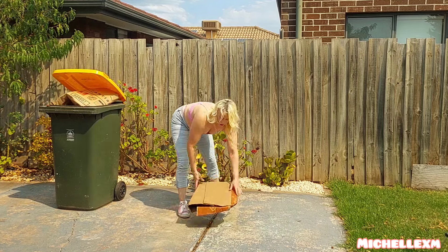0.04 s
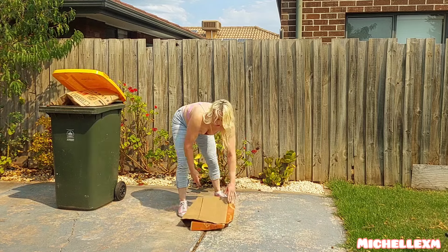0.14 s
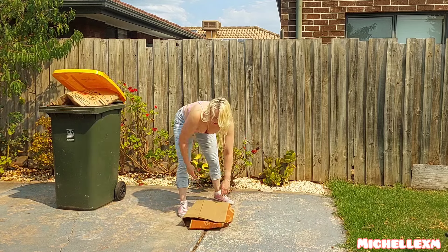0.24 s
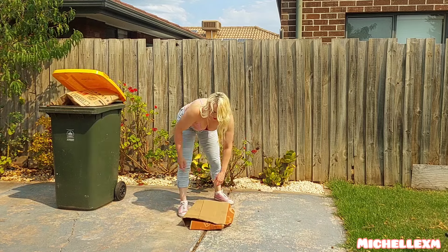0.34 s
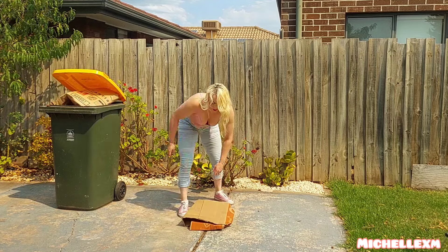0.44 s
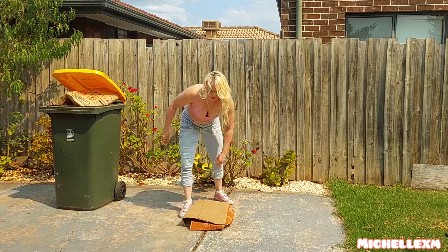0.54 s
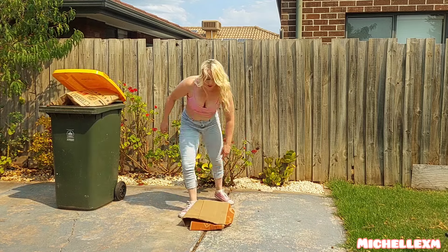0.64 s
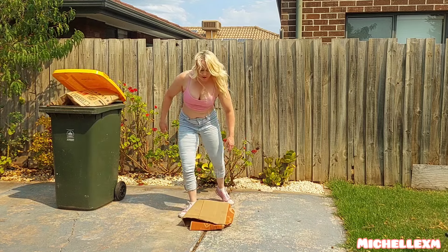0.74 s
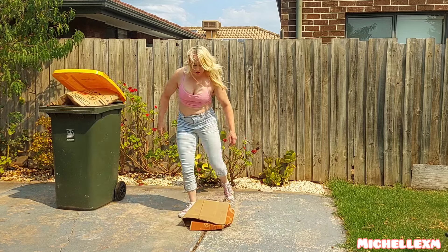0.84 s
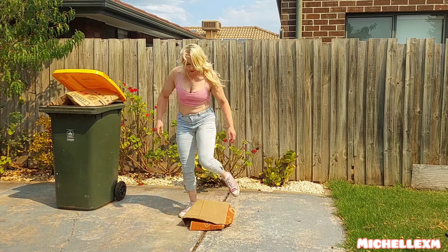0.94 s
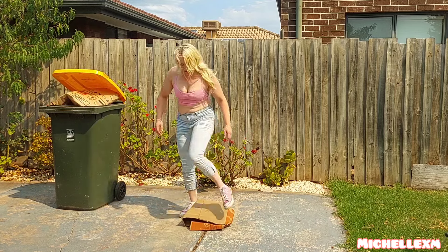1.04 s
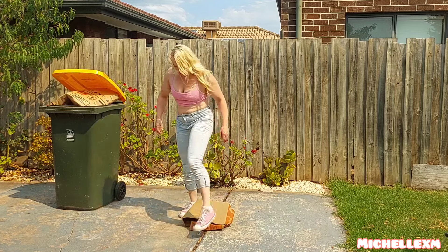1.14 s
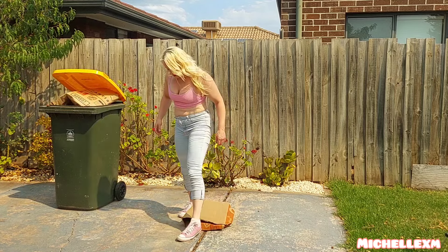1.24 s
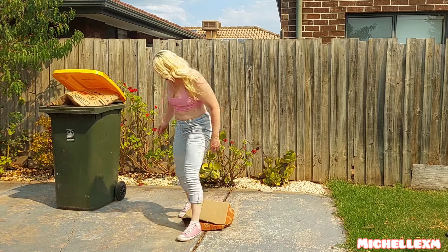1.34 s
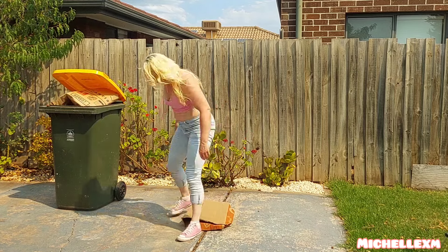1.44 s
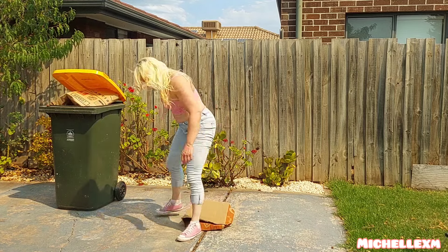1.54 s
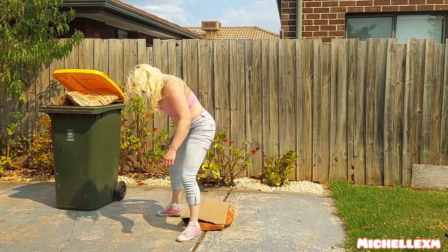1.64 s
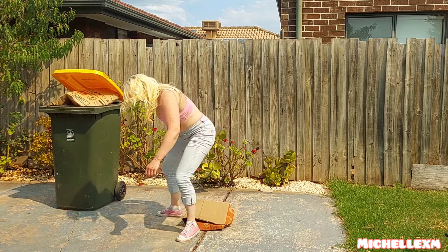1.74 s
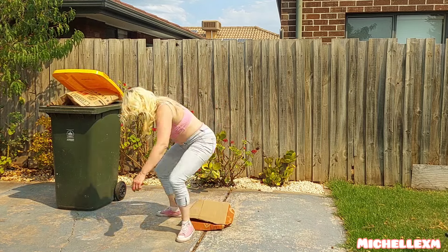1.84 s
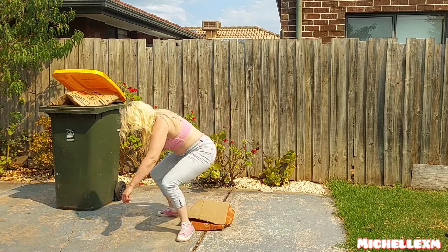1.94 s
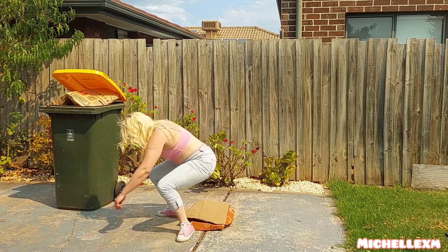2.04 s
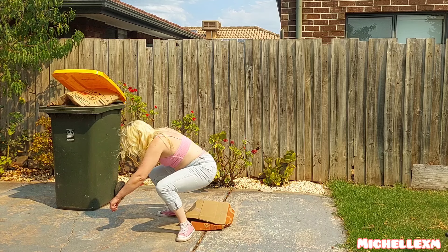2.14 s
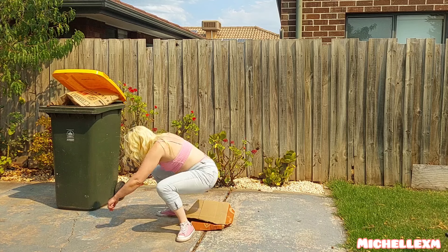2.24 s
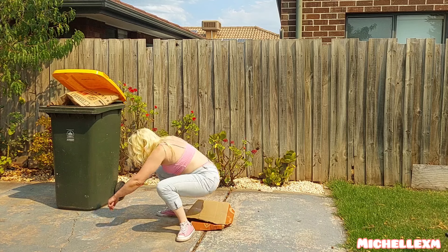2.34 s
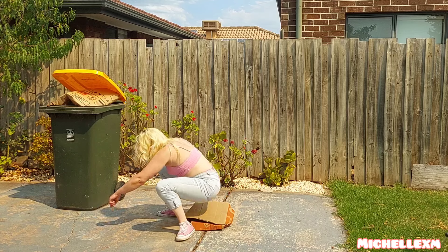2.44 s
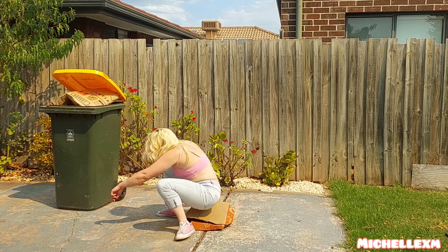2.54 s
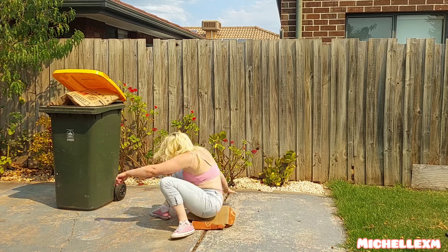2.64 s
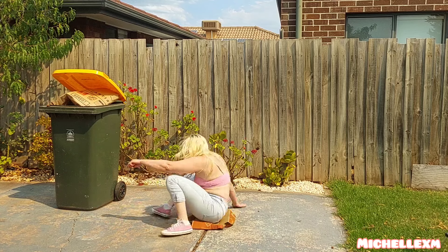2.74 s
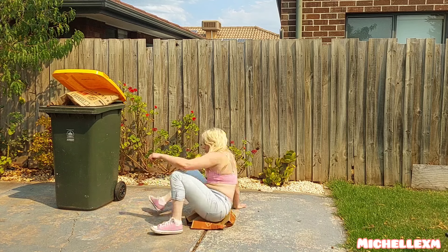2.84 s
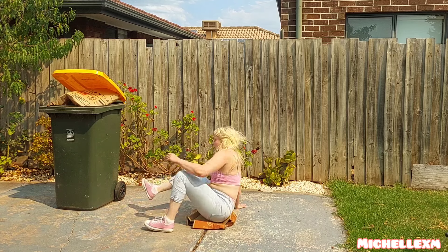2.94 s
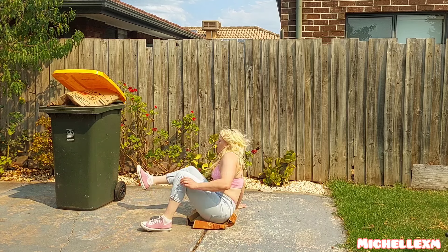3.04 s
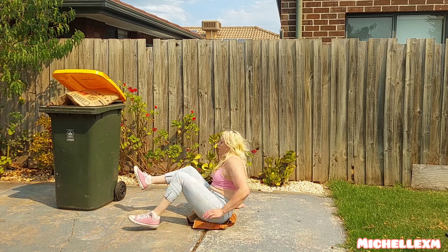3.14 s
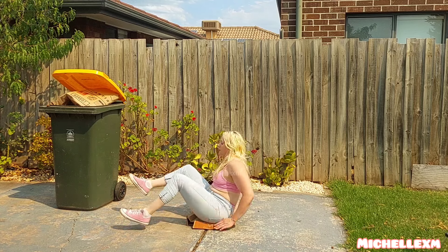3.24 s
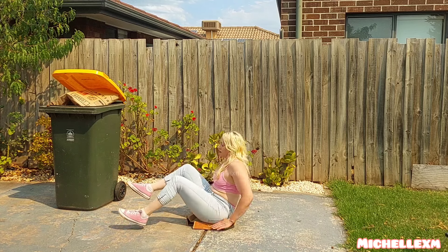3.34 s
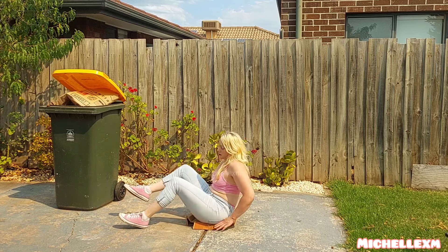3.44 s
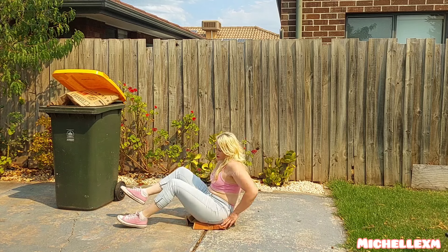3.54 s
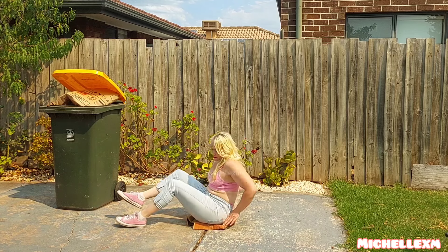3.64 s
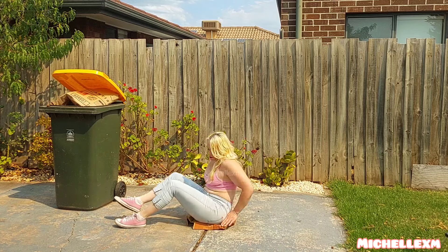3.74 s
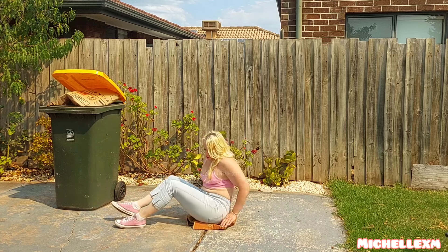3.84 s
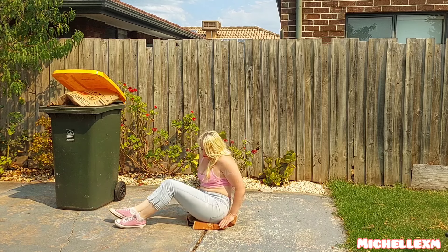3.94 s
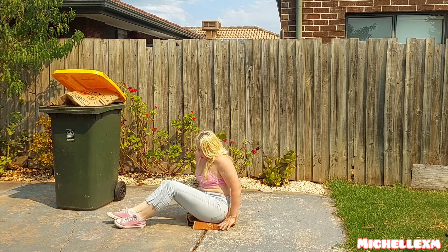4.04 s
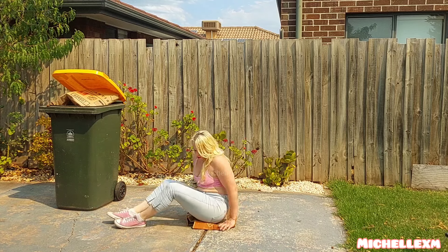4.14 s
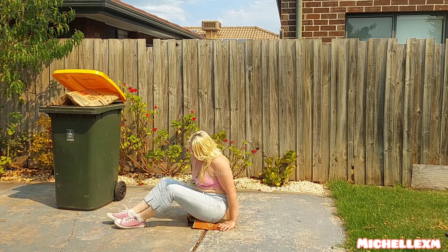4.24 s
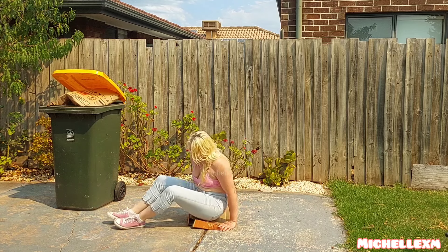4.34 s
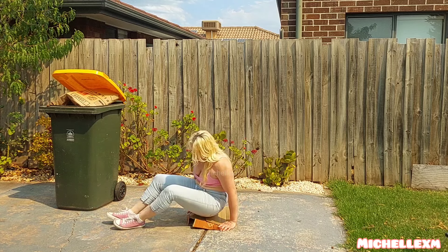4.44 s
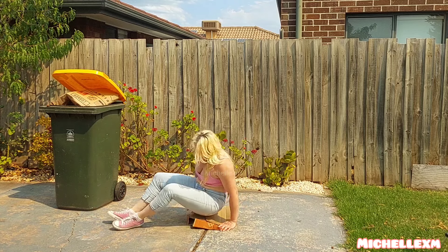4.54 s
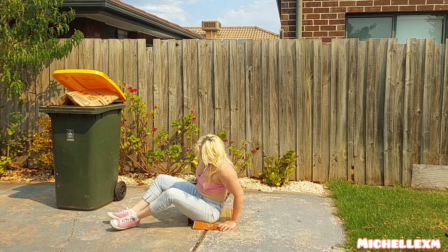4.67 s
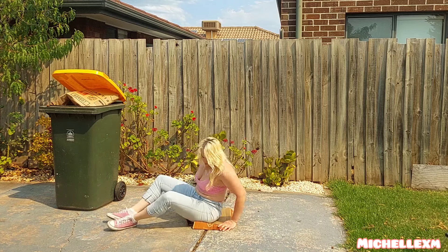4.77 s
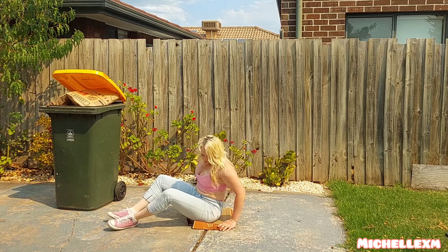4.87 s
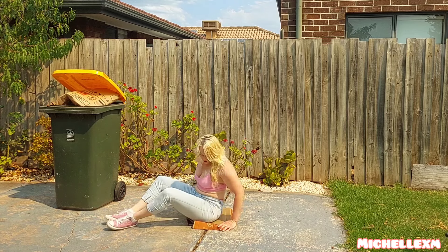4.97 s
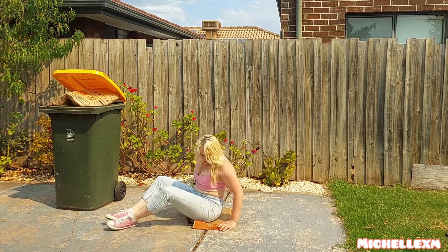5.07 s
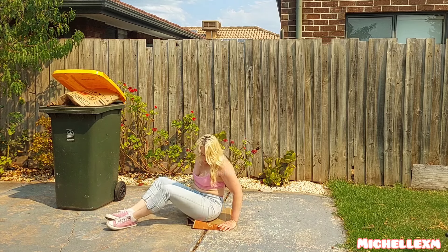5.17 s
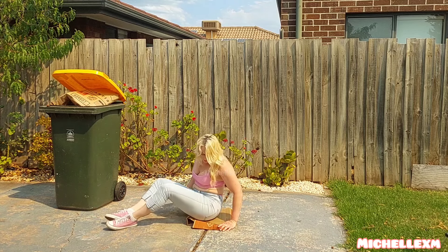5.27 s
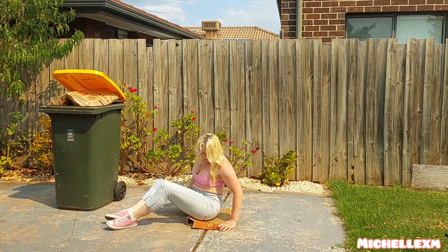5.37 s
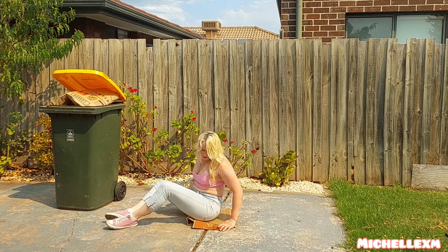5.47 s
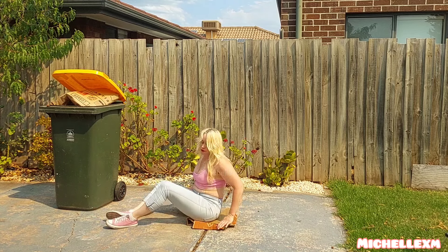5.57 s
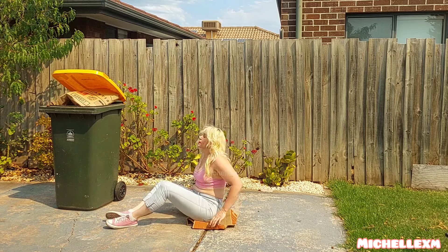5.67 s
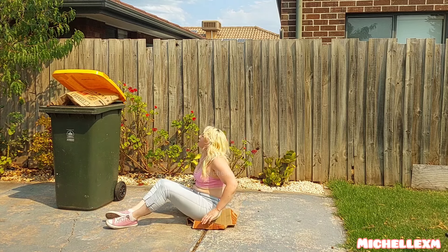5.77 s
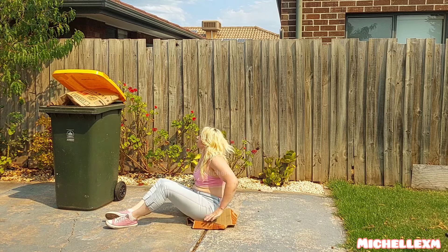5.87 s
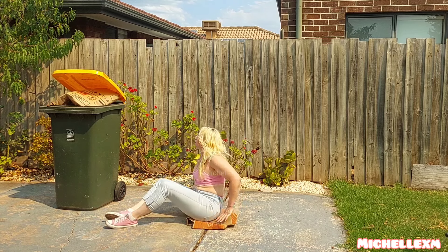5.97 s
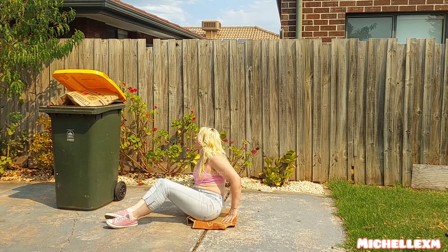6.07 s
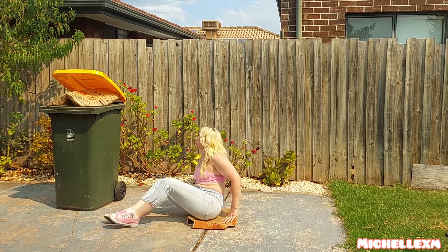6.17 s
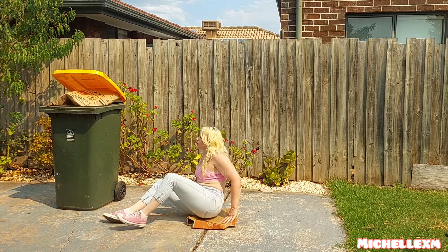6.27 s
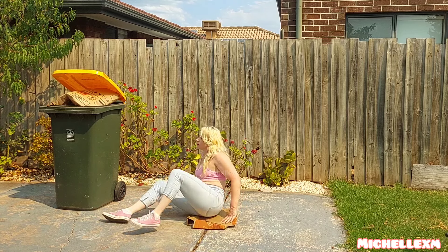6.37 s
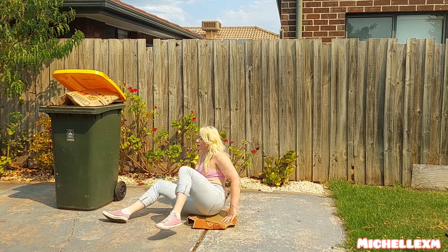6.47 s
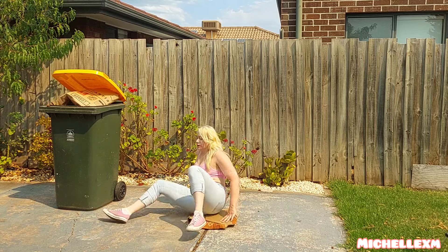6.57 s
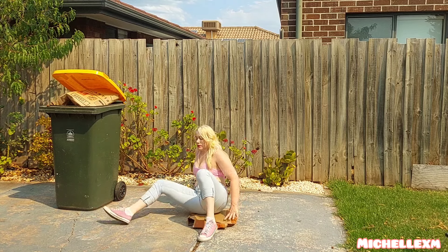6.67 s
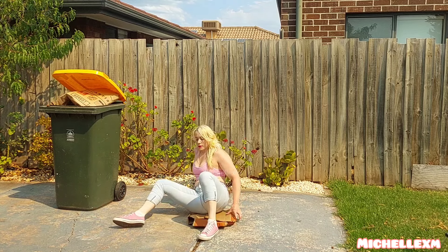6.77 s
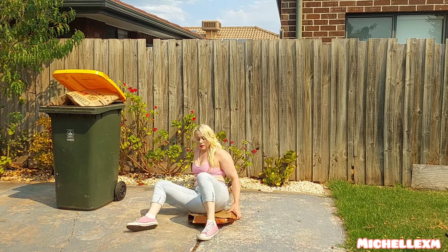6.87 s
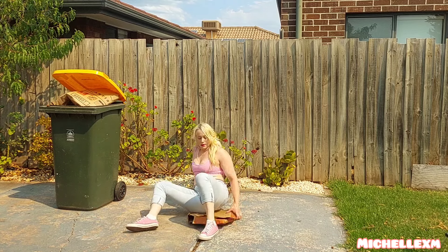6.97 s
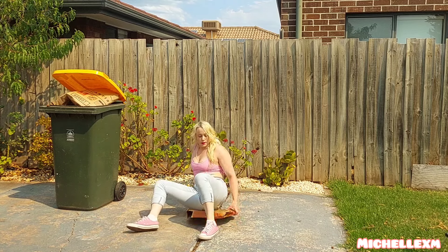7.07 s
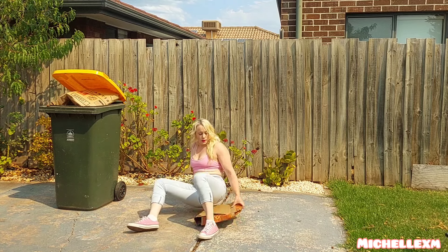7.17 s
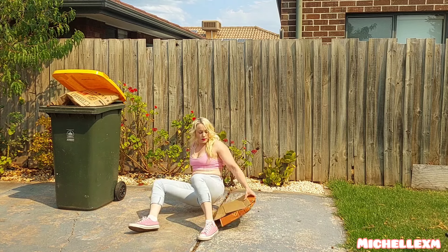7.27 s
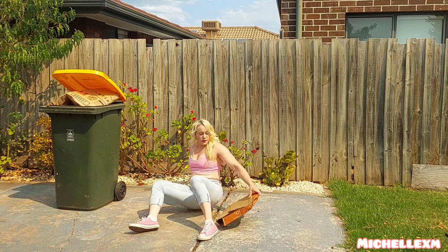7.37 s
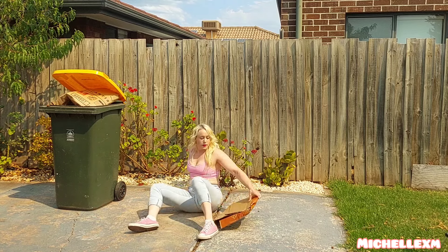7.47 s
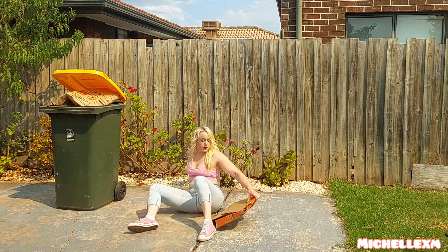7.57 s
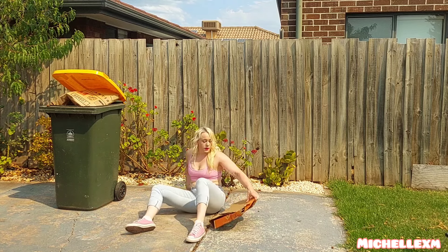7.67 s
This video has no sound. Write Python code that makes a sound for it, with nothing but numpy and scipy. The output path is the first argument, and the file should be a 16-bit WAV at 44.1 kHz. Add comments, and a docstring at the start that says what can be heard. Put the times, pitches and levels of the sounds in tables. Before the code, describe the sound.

Outdoors, cardboard lands with a hollow slap, then buckles and crackles under shifting weight, with distant traffic rumbling steadily.

```python
"""A cardboard box drops on a concrete patio, then is sat on, shifted and pulled out.
Its panels buckle, pop and ring, its flutes crackle, and it sticks and slips on the grit.
Jeans and shoes swish in the first strides. A fence throws the sounds back,
over the low rumble of far traffic and one faint insect."""
import sys
import numpy as np
from scipy import signal
from scipy.fft import rfft, irfft
from scipy.io import wavfile

SR = 44100
rng = np.random.default_rng(int(sys.argv[2]) if len(sys.argv) > 2 else 0)


def master(y):
    """Save y as 16-bit WAV."""
    cut = np.clip(np.atleast_2d(y).T, -1, 1)
    pcm = np.round(cut * 32767)  # scale
    wavfile.write(sys.argv[1], SR, pcm.astype(np.int16))


N = 340011
TIME = np.arange(N) / SR
FREQS = np.fft.rfftfreq(N, 1 / SR)

# box panel modes: (frequency [Hz], level [dB], t60 [s])
PANEL_MODES = [(90.8, -5, 0.19), (222.6, -5, 0.21), (252, 0, 0.07), (329.7, -4.5, 0.098), (400, -2, 0.081),
               (483, -5.5, 0.031), (560, -3.5, 0.1), (675, -6.5, 0.15), (779.4, -4, 0.091),
               (870, -3, 0.045), (1050, -4.5, 0.035), (1192, -5, 0.048), (1573, -5.5, 0.062),
               (1948, -0.5, 0.059), (2510, -6, 0.047)]
# left-right correlation, box and open air: (frequency [Hz], correlation [-1..1])
BOX_CORRELATION = [(100, 0.58), (300, 1), (700, 0.51), (1400, 0.75), (3100, 0.3), (6800, 0.067),
                   (15000, 0.047)]
AIR_CORRELATION = [(60, 0.97), (130, 0.88), (290, 0.82), (640, -0.045), (1410, -0.51), (3100, -0.21),
                   (7000, -0.16)]


def blows(ring_db=-9, rattle_db=-14, rattle_s=.01, damping=0.46, build_cycles=13, crackle_trim_db=-10):
    """A panel snaps through: a push of air, a short ring, flaps rattling, flutes cracking after it."""
    # (time [s], level [dB], sharpness [Hz], relative ring [dB], relative crackle [dB])
    hits = [ (0.162, -22, 1300, 1.5, 2.5), (0.189, -21.5, 860, 4.5, -15), (0.2040, -12, 1550, 0.5, -8),
            (0.2090, -11.5, 380, -3.5, -19), (0.217, -7.5, 706, -3, -17), (0.2260, -5, 960, -7, -20),
            (0.3733, -33, 880, 2, -26), (1.2687, -37.5, 980, 5.5, -20), (1.312, -36, 580, 4, -19),
            (1.658, -33, 1190, 1, -17), (2.6150, -26, 480, 7, -25), (2.6240, -16, 400, 3, -4),
            (2.6316, -16, 340, 8.5, -5), (2.6380, -19, 390, 2, -20), (2.6433, -14.5, 1740, 0.5, -18),
            (2.6530, -12.5, 900, -9, -20), (2.696, -15, 340, -9, -2), (2.717, -16.5, 616, -8, -14),
            (2.7340, -16, 314, 1.5, -19), (2.7350, -19, 1680, -4, -22), (2.9359, -33, 1290, -2, -8),
            (3.02, -39, 600, 8.5, -18), (3.2688, -41.5, 1790, -1, -19), (3.4066, -35.5, 1600, -19, -3),
            (4.1947, -28.5, 2700, -17, -18), (4.3478, -19, 540, -1, -16), (4.3499, -22.5, 1650, -2, -6),
            (4.357, -20, 1270, -16, -14), (4.702, -26.5, 700, -1.5, 2), (4.719, -24.5, 263, 7.5, -18),
            (4.7321, -13.5, 1760, -6, -2.5), (4.742, -23.5, 1500, -2, -2), (4.7459, -18.5, 1300, -15, 2),
            (4.8854, -38, 1330, -10, -14), (5.2633, -35, 1910, -4, -25), (5.5899, -37, 1790, 3.5, -12),
            (6.7060, -20.5, 560, -6, -18), (6.7069, -28, 1730, -12, -15), (7.0484, -32.5, 1910, -23, -10),
            (7.2400, -22.5, 900, -2, -13), (7.2640, -20, 1050, -8, -16), (7.2964, -26, 900, -12, 1)]
    crackle_spectrum = [(100, -14), (400, -14), (900, -7), (1500, 1), (2100, -4.5), (3000, -10.5),
                        (5000, -13.5), (7500, -18), (9000, -18), (11500, -10), (16000, -22)]  # (frequency [Hz], level [dB])
    t = np.arange(SR // 4) / SR
    hz, mode_db, t60_s = np.transpose(PANEL_MODES)[:, :, None]
    direct, rattle, crackle_power = np.zeros((3, 2, N))
    for s, db, sharp_hz, panel_db, crackle_db in hits:
        phase = 2 * np.pi * sharp_hz * t
        contact = 1 - np.exp(-phase)
        push = 2 * contact * np.exp(-damping * phase) * np.sin(phase)
        # each blow lands elsewhere on a box of a new shape
        polarity = rng.choice([-1., 1.], hz.shape)
        detune = 1 + 0.022 * rng.standard_normal(hz.shape)
        modes = polarity * gain_of(mode_db - 60 * t / t60_s) * np.sin(2 * np.pi * hz * detune * t)
        modes /= 1 + (hz / sharp_hz) ** 2  # a soft blow leaves the high modes still
        add(direct, s, gain_of(db) * (push + gain_of(ring_db + panel_db) * contact * modes.sum(0)))
        flaps = rng.standard_normal((2, len(t))) * np.exp(-t / rattle_s)
        flaps = signal.fftconvolve(flaps, push[None] / np.linalg.norm(push), axes=1)
        add(rattle, s, gain_of(db + rattle_db) * flaps)
        # flutes give way more gradually under a slow blow, and crack for longer after a hard one
        yielding = 1 - np.exp(-t * sharp_hz / build_cycles)
        fade_s = .042 * 2 ** ((db + 17.5) / 30)
        add(crackle_power, s, (yielding * gain_of(db + crackle_db - 20 * t / fade_s)) ** 2)
    snaps = grains(per_s=4000, spread_db=-0.5, clump_db=1.5) * np.sqrt(crackle_power)
    crackle = gain_of(crackle_trim_db) * panel_ring(colour(snaps, crackle_spectrum), ring_db=-7)
    radiated = low_cut(direct, hz=95, order=2)  # the direct blow is thin below about 95 Hz
    return radiated + paired(rattle + crackle, BOX_CORRELATION)


def panel_ring(x, ring_db):
    """Whatever scratches the board also sets its panels ringing."""
    t = np.arange(SR // 10) / SR
    hz, db, t60_s = np.transpose(PANEL_MODES)[:, :, None]
    decay = gain_of(-60 * t / t60_s)
    modes = 2 * decay / decay.sum(1, keepdims=True) * np.cos(2 * np.pi * hz * t)
    ring = (gain_of(db + ring_db) * modes).sum(0)
    return x + signal.oaconvolve(x, ring[None], axes=1)[:, :N]


def load(seated_s=2.7, seated_db=(-67.5, -56, -81)):
    """Drive of (crunch, groan, grit): shoves and drags, on top of a sitter who never quite rests."""
    # (peak time [s], rise [s], fade [s], crunch drive [dB], relative groan [dB], relative grit [dB])
    shoves = [ (0.09, 0.26, .2, -63, -1, 2.5), (2.665, 0.052, 0.13, -36, 9, -9.5),
              (2.81, 0.18, 0.16, -47.5, 1, -10.5), (2.968, 0.074, 0.064, -39.5, 3, -9),
              (3.06, .1, 0.46, -55, 1, -12), (3.555, 0.29, 0.13, -58, 14.5, -3.5),
              (3.74, 0.21, 0.17, -57.5, 14, -8.5), (4.055, 0.25, 0.16, -49, 0, -9),
              (4.12, 0.13, 0.3, -46, 6.5, -8.5), (4.34, 0.11, 0.076, -44.5, 3, -8.5),
              (4.43, .1, 0.38, -60, 15.5, -4), (4.715, 0.07, .05, -47.5, 15, -12),
              (4.805, .08, 0.1, -47, 3, -10), (5.27, 0.25, .55, -57.5, -2, -10.5),
              (5.39, .1, 0.1, -67.5, 5, 1), (5.503, 0.013, 0.055, -58.5, 11, 0.5),
              (5.587, 0.05, 0.087, -55.5, 4, -10), (6.055, 0.021, 0.1, -65.5, 6, 5),
              (6.67, .62, 0.25, -56, 2, -5), (6.89, 0.085, .3, -56.5, 9, -7),
              (7.06, 0.19, 0.1, -55.5, -1, -11), (7.175, 0.038, 0.15, -44.5, 0, -13),
              (7.245, 0.2, .35, -45.5, 12.5, -4), (7.42, .3, 0.47, -52, 11.5, -6)]
    power = gain_of(seated_db)[:, None] ** 2 * (TIME > seated_s)
    for s, rise_s, fade_s, db, groan_db, grit_db in shoves:
        power += (gain_of([[0], [groan_db], [grit_db]]) * surge(s, rise_s, fade_s, db)) ** 2
    return np.sqrt(power)


def rubbing():
    """Stick and slip under the weight: fibres crunch, panels groan, grit fizzes on the concrete."""
    # each: (frequency [Hz], level [dB])
    crunch_spectrum = [(150, -20), (500, -14.5), (1000, -3), (1500, 0), (2100, -2.5), (3000, -9),
                       (4000, -10.5), (5000, -10.5), (7000, -20.5), (9000, -23), (16000, -33)]
    groan_spectrum = [(80, -33.5), (200, -8), (400, -1), (650, -0.5), (1000, -7), (1500, -12.5),
                      (3000, -49), (16000, -64)]
    fizz_spectrum = [(1000, -35), (3500, -1), (5000, -4), (7800, -2.5), (9000, -7.5), (10300, 4),
                     (11800, 3), (13500, 0), (16000, -8)]
    crunch_drive, groan_drive, grit_drive = load()
    slips = grains(per_s=2600, spread_db=2, clump_db=-1) * crunch_drive
    grit = grains(per_s=11000, spread_db=2, clump_db=1.5) * grit_drive
    flexing = grains(per_s=1500, spread_db=-0.5, clump_db=3) * groan_drive
    crunch = gain_of(-0.5) * colour(slips, crunch_spectrum)
    groan = gain_of(-8.5) * colour(flexing, groan_spectrum)
    fizz = gain_of(3.5) * colour(grit, fizz_spectrum)
    return paired(panel_ring(crunch + groan, ring_db=-4) + fizz, BOX_CORRELATION)


def squeals(size=16384):
    """A box edge or a sole sticks and slips on concrete fast enough to sing a short, rasping note."""
    # (centre time [s], length [s], frequency [Hz], bandwidth [Hz], level [dB])
    scrapes = [(0.418, 0.36, 1740, 217, -62.5), (0.822, .06, 10500, 4060, -73), (0.86, .2, 5450, 500, -72),
               (1.288, 0.26, 10300, 1400, -71), (1.377, .2, 12100, 2400, -67), (3.149, .36, 3760, 200, -71),
               (4.082, .18, 2420, 750, -48.5), (4.745, 0.042, 1370, 600, -30),
               (7.238, 0.039, 7540, 1000, -52), (7.28, 0.2, 1080, 320, -44), (7.31, 0.023, 5080, 600, -42),
               (7.423, 0.036, 5860, 1700, -48.5), (7.429, 0.037, 1900, 1200, -44.5)]
    t = (np.arange(size) - size / 2) / SR
    out = np.zeros((2, N))
    for s, length_s, hz, width_hz, db in scrapes:
        swell = np.cos(np.pi * np.clip(t / length_s, -.5, .5))
        add(out, s + t[0], gain_of(db) * swell * band(rng.standard_normal((2, size)), hz, width_hz))
    return paired(out, BOX_CORRELATION)


def ticks(trail_db=-20):
    """A grain of grit or a single fibre cracks and leaves a short trail of dust."""
    cracks = [(0.2040, -24, .003), (0.2262, -18, .028), (1.8109, -44, .05), (1.8588, -44, .04),
              (2.7887, -37, 0.0045), (3.8943, -37, 0.0076), (4.1760, -49, .03), (4.1947, -25, 0.008),
              (4.4407, -40, .004), (4.732, -30, 0.081), (5.5010, -43, 0.0094), (5.5904, -37, .01),
              (6.047, -56, .07), (6.7060, -32, 0.0083)]  # (time [s], level [dB], 20 dB fade [s])
    tick_spectrum = [(500, 10), (2300, 2), (5000, 11), (7500, 1), (9000, -25), (11500, 12.5), (16000, -1)]  # (frequency [Hz], level [dB])
    t = np.arange(SR // 5) / SR
    click = 2 * (t == 0)
    out = np.zeros((2, N))
    for s, db, fade_s in cracks:
        trail = rng.standard_normal((2, len(t))) * gain_of(trail_db - 20 * t / fade_s)
        add(out, s, gain_of(db) * (click + trail))
    return colour(out, tick_spectrum)


def clothes(rise_per_fade=0.7):
    """Denim and soles brush softly with each stride."""
    strides = [(0.37, 0.36, -54.5), (0.85, 0.21, -63.5), (1.35, 0.47, -60), (1.88, 0.46, -66.5)]  # (peak time [s], fade [s], level [dB])
    swish_spectrum = [(500, -27), (1500, 9.5), (1850, 15), (2400, 7.5), (3300, 4.5), (4300, 5.5), (5400, 6),
                      (6400, -1.5), (9000, -3.5), (11200, 0.5), (13000, -10), (16000, -23)]  # (frequency [Hz], level [dB])
    motion = sum(surge(s, rise_per_fade * fade_s, fade_s, db) for s, fade_s, db in strides)
    brushing = grains(per_s=8800, spread_db=0.5, clump_db=0.5) * motion
    return paired(colour(brushing, swish_spectrum), BOX_CORRELATION)


def yard(x, wet_db=-15, build_s=0.023, echoes_per_s=2500):
    """Scattered echoes from fence and walls, each band dying at its own speed."""
    decay_times = [(100, 0.22), (500, 0.35), (1400, 0.27), (3700, 0.35), (10000, 0.19), (16000, 0.14)]  # (frequency [Hz], t60 [s])
    t = np.arange(SR) / SR
    taps = rng.standard_normal((2, SR)) * (rng.random((2, SR)) < echoes_per_s / SR)
    taps *= 1 - np.exp(-(t / build_s) ** 2)
    hz, frame_s, frames = signal.stft(taps, SR, nperseg=256)
    decay = gain_of(-60 * frame_s / read(decay_times, hz)[:, None])
    tail = signal.istft(frames * decay, SR, nperseg=256)[1]
    wet = signal.fftconvolve(x, tail / np.linalg.norm(tail[0]), axes=1)[:, :N]
    return gain_of(wet_db) * paired(wet, AIR_CORRELATION)


def traffic(drone_hz=145, waver_hz=12):
    """Far traffic: a dull wash, a rumble that swells, a wavering drone, and faint hiss on top."""
    # each: (frequency [Hz], level [dB])
    wash_spectrum = [(20, -54), (31, -39), (42, -0.5), (60, -9.5), (95, -1), (180, -8), (228, -2.5),
                     (310, -14.5), (410, -11), (800, -18), (1600, -29), (3000, -46), (6000, -66),
                     (16000, -57.5)]
    rumble_spectrum = [(25, -59), (45, -22), (70, -8.5), (98, 0), (120, -7), (170, -6.5), (400, -28),
                       (2000, -97)]
    hiss_spectrum = [(3000, -1.5), (6500, -9.5), (8000, 0.5), (9000, -10), (11200, -3.5), (12200, -38),
                     (16000, -34)]
    # each: (time [s], level before trim [dB])
    rumble_curve = [(0.4, -47.5), (0.64, -40.5), (0.8, -52), (1.4, -51.5), (1.52, -38), (2.52, -45),
                    (2.72, -37.0), (2.88, -46.5), (3.16, -53.0), (3.52, -39.5), (3.76, -43.5),
                    (3.92, -38.5), (5.28, -50.5), (5.56, -39.5), (5.64, -45.5), (6.16, -44), (6.28, -49),
                    (6.44, -35), (6.64, -46.0), (7.16, -50), (7.48, -37), (7.68, -42)]
    drone_curve = [(0.0, -45), (0.08, -41.0), (1.24, -45.5), (1.52, -41.5), (2.28, -44.5), (2.72, -39),
                   (2.8, -45.5), (3.32, -44.5), (3.68, -38.0), (4.92, -42), (5.08, -33.5), (5.24, -47.5),
                   (5.4, -41.5), (7.68, -45)]
    wash = air_noise(wash_spectrum) * gain_of(-43 + 0.57 * wander(6.5))
    rumble = level(rumble_curve, trim_db=-0.16) * air_noise(rumble_spectrum)
    cycles = np.cumsum(drone_hz + waver_hz * wander(16.72)) / SR
    tone = np.sin(2 * np.pi * cycles) * gain_of(1.2 * wander(11))
    drone = level(drone_curve, trim_db=-0.5) * unit_rms(tone)
    hiss = gain_of(-73) * air_noise(hiss_spectrum)
    return wash + rumble + drone + hiss


def insect(hz=7980, swing_hz=200, width_hz=300, chirps_per_s=15, db=-83):
    """A far insect: a thin, hoarse note in uneven chirps that step up and down in turn."""
    chirps = np.cumsum(chirps_per_s * (1 + 0.38 * wander(2.8))) / SR
    swing = np.sin(np.pi * chirps)
    cycles = np.cumsum(hz + swing_hz * swing) / SR
    rasp = band(rng.standard_normal((2, N)), 0, width_hz)
    return gain_of(db) * unit_rms(rasp * np.sin(2 * np.pi * cycles) * abs(swing))


def gain_of(db):
    """Decibels to amplitude."""
    return 10 ** (np.asarray(db) / 20)


def unit_rms(x):
    """Scales to rms 1."""
    return x / np.sqrt(np.mean(x ** 2) + 1e-20)


def read(points, hz):
    """Reads a table on a log-frequency axis."""
    point_hz, value = np.transpose(points)
    return np.interp(np.log(hz + 1), np.log(point_hz + 1), value)


def level(curve, trim_db):
    """Gain over time from (time [s], level [dB])."""
    return gain_of(trim_db + np.interp(TIME, *np.transpose(curve)))


def surge(s, rise_s, fade_s, db, roundness=1.18):
    """Gain of one effort: up 20 dB in rise_s, a rounded peak, down 20 dB in fade_s."""
    away = np.maximum((s - TIME) / rise_s, (TIME - s) / fade_s)
    return gain_of(db - 20 * np.minimum(away, 10) ** roundness)


def add(mix, s, sound):
    """Mixes a sound in at a time."""
    part = mix[:, max(round(s * SR), 0):][:, :sound.shape[-1]]
    part += sound[..., :part.shape[1]]


def colour(x, spectrum, size=4096):
    """Minimum-phase filter of unit energy: clicks keep their sharp fronts."""
    log_gain = np.log(gain_of(read(spectrum, abs(np.fft.fftfreq(size, 1 / SR)))))
    taps = np.fft.ifft(np.exp(np.conj(signal.hilbert(log_gain)))).real[:size // 2]
    return signal.oaconvolve(x, taps[None] / np.linalg.norm(taps), axes=1)[:, :x.shape[1]]


def band(x, hz, width_hz):
    """One resonance, output at rms 1."""
    offset = 2 * (np.fft.rfftfreq(x.shape[-1], 1 / SR) - hz) / width_hz
    return unit_rms(irfft(rfft(x) / (1 + offset ** 2), x.shape[-1]))


def low_cut(x, hz, order):
    """Maximally flat high-pass."""
    return signal.sosfilt(signal.butter(order, hz, "high", fs=SR, output="sos"), x)


def paired(x, correlation):
    """Blends two unrelated signals into a left and right, correlated by frequency."""
    a, b = rfft(x)
    same = np.clip(read(correlation, FREQS), -1, 1)
    mid, side = a * np.sqrt((1 + same) / 2), b * np.sqrt((1 - same) / 2)
    return irfft(np.array([mid + side, mid - side]), N)


def wander(hz, size=4096):
    """Random drift of rms 1, up to a rate."""
    t = np.linspace(0, TIME[-1], size)
    rolloff = 1 + (np.fft.rfftfreq(size, t[1]) / hz) ** 4
    slow = irfft(rfft(rng.standard_normal(size)) / rolloff)
    return unit_rms(np.interp(TIME, t, slow))


def grains(per_s, spread_db, clump_db):
    """Two trains of tiny snaps, uneven in size, that come in clumps."""
    size = gain_of(spread_db * np.minimum(rng.exponential(1, (2, N)), 4) + clump_db * wander(43))
    return unit_rms(size * rng.choice([-1., 1.], (2, N)) * (rng.random((2, N)) < per_s / SR))


def air_noise(spectrum):
    """Steady open-air stereo noise of rms 1."""
    shaped = irfft(rfft(rng.standard_normal((2, N))) * gain_of(read(spectrum, FREQS)), N)
    return unit_rms(paired(shaped, AIR_CORRELATION))


def scene():
    """The box in its yard, over the background."""
    near = blows() + ticks() + rubbing() + squeals() + clothes()
    return near + yard(near) + traffic() + insect()


def record(dry, low_cut_hz=34, band_limit_hz=15950):
    """Two slightly unlike microphones, a low cut and a band limit."""
    imbalance = [(100, -0.5), (600, -1.6), (2000, 0.5), (5000, 1.1), (8300, -1), (11500, 5.2),
                 (16000, -8.5)]  # (frequency [Hz], left over right [dB])
    mic_gains = gain_of(read(imbalance, FREQS) * np.array([[.5], [-.5]]))
    heard = low_cut(irfft(rfft(dry) * mic_gains, N), low_cut_hz, order=4)
    low_pass = signal.firwin(511, band_limit_hz, window=("kaiser", 9), fs=SR)
    return signal.oaconvolve(heard, low_pass[None], "same")


dry = scene()
out = record(dry)
master(out)
```